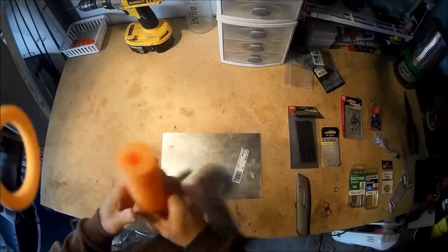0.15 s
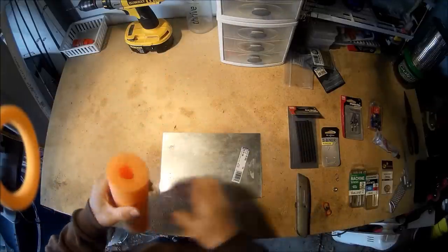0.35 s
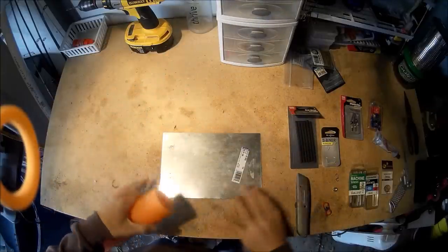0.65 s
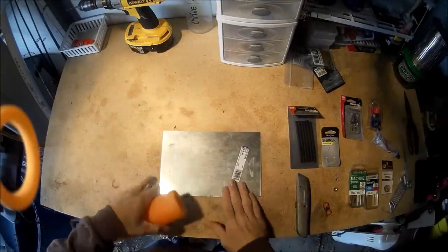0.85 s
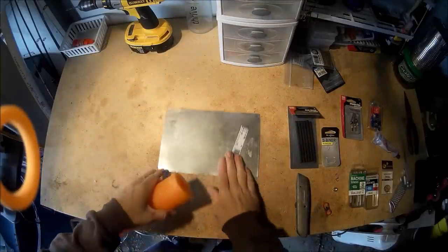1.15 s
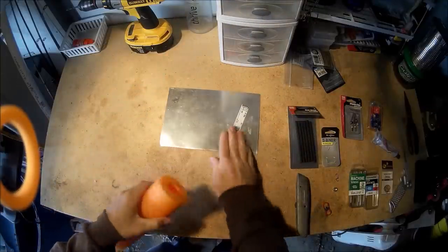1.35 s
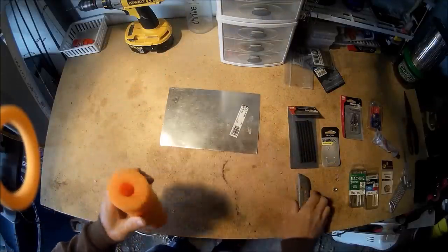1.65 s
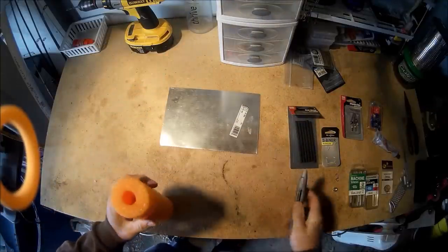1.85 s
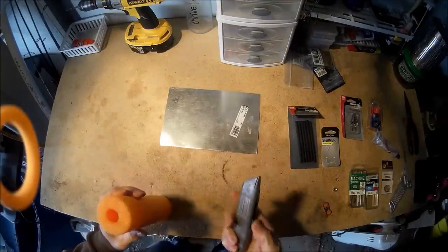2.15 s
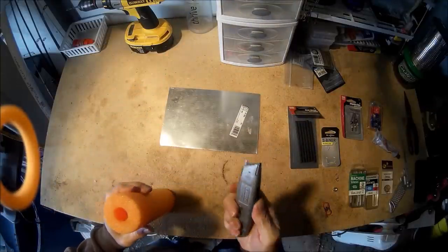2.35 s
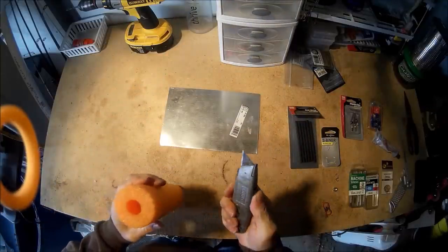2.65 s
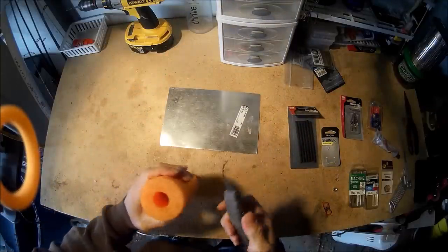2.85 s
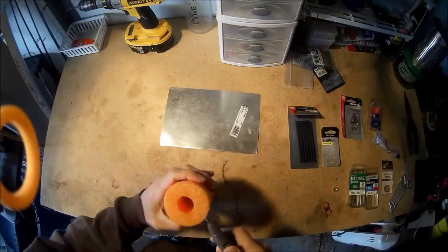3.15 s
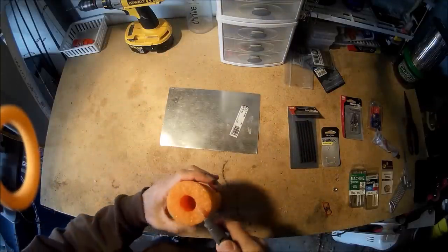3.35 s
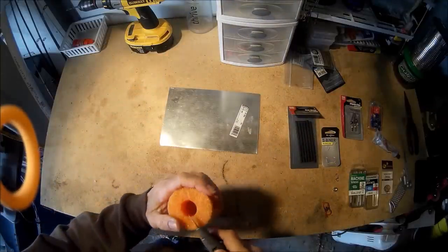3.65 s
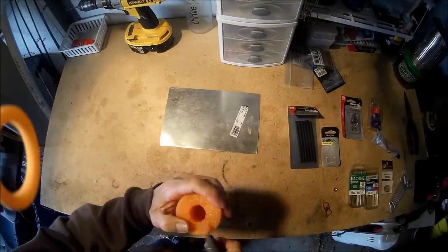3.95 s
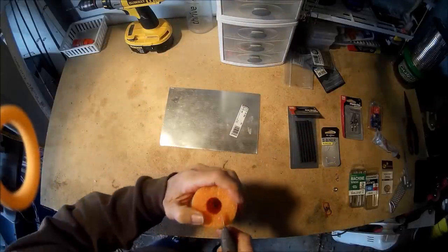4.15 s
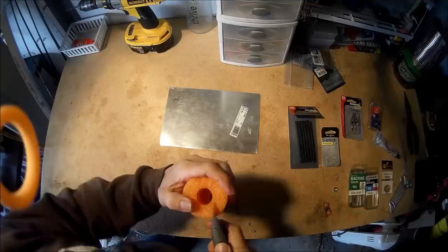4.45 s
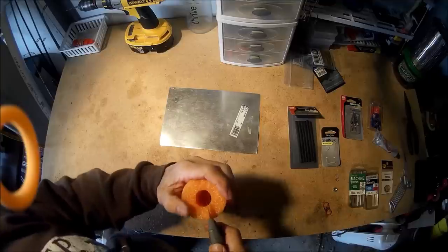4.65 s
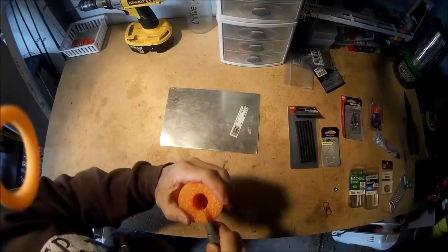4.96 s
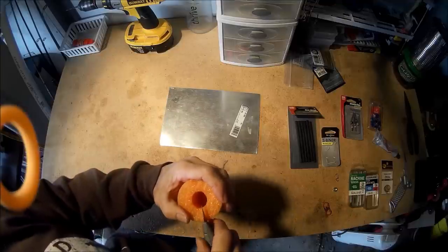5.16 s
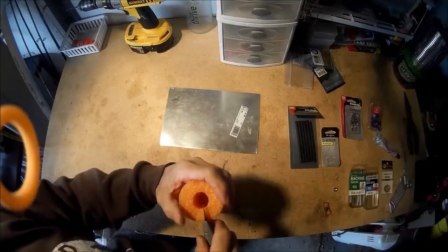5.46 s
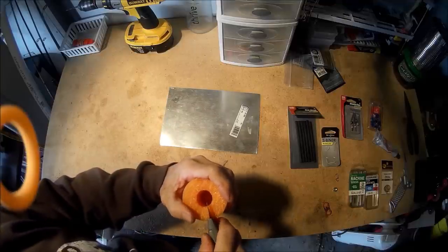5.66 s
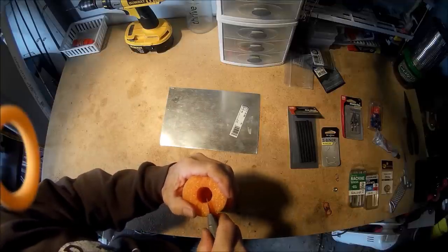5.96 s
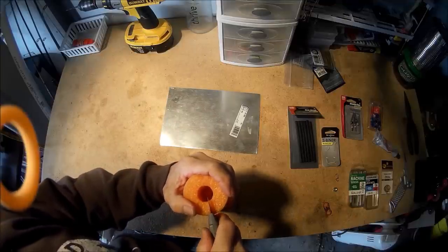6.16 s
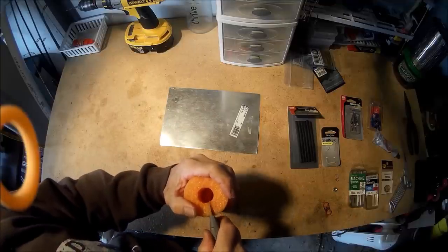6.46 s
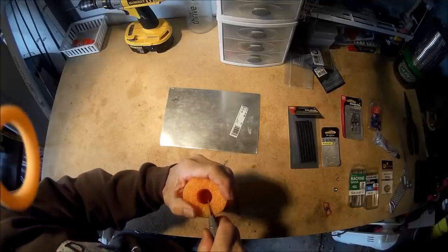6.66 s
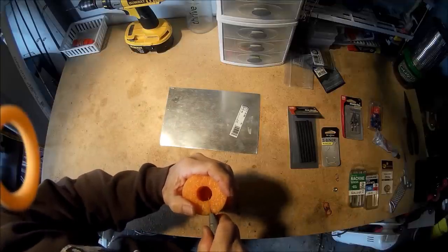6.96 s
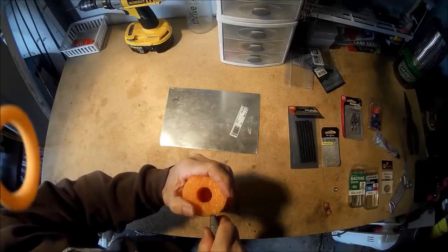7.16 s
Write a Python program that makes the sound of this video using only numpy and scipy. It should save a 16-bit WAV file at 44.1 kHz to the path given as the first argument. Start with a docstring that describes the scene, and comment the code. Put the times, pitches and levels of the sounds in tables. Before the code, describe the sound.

Quiet workbench handling with a sheet scrape and knife clicks, faint foam squeaks, one sharp loud pop, then short crisp tearing strokes.

```python
"""Foam rubs under turning fingers over a faint hiss; a steel sheet scrapes away and a utility knife rattles.
The blade rubs and ticks, breaks through a foam tube with one loud pop and slices on in crackly strokes.
Friction and tearing are random grains through coloured spectra; hard contacts ring sets of resonances.
Bench top and near shelves answer every handling sound in this small shop."""
import sys
import numpy as np
from scipy import signal
from scipy.fft import rfft, irfft, next_fast_len
from scipy.io import wavfile

SR = 44100
rng = np.random.default_rng(int(sys.argv[2]) if len(sys.argv) > 2 else 0)


def output_pcm(signal):
    """Save a mono or channel-first signal as 16-bit PCM at the path in sys.argv[1].

    Samples are clipped to [-1, 1] before scaling.
    """
    pcm = np.clip(np.atleast_2d(signal).T, -1, 1) * 32767
    wavfile.write(sys.argv[1], SR, np.round(pcm).astype(np.int16))


N = 322371
T = np.arange(N) / SR
SIZE = next_fast_len(N + SR)  # padded, so that tails do not wrap round
HZ = np.fft.rfftfreq(SIZE, 1 / SR)


def amp(db):
    """Decibels to gain."""
    return 10 ** (np.asarray(db) / 20)


def unit(x):
    """x at rms 1."""
    return x / np.sqrt(np.mean(x ** 2) + 1e-20)


def along(points, hz):
    """(Hz, value) points read on a log frequency axis."""
    f, value = np.transpose(points)
    return np.interp(np.log(hz + 1), np.log(f), value)


def gain(rows):
    """A (s, dB) curve as gain per sample, silent outside its span."""
    s, db = np.transpose(rows)
    return amp(np.interp(T, s, db, left=-200, right=-200))


def filtered(x, response):
    """x through a frequency response."""
    return irfft(rfft(x, SIZE) * response, SIZE)[:N]


def colour(points):
    """The causal response with this spectrum: its cepstrum is folded onto positive time."""
    cepstrum = irfft(np.log(amp(along(points, HZ))), SIZE)
    cepstrum[1:SIZE // 2] *= 2
    cepstrum[SIZE // 2:] = 0
    return np.exp(rfft(cepstrum))


def body(modes):
    """The summed response of resonances (Hz, width Hz, dB)."""
    return sum(amp(db) * 1j * HZ * w / (f * f - HZ * HZ + 1j * HZ * w) for f, w, db in modes)


def peaked(response):
    """The response scaled so that a unit impulse peaks at 1."""
    return response / np.abs(irfft(response, SIZE)).max()


def low_passed_noise(corner_hz):
    """Noise at rms 1 that wanders no faster than about corner_hz."""
    return unit(filtered(rng.standard_normal(N), 1 / (1 + (HZ / corner_hz) ** 4)))


def blows(rows, chatter=0, life=.003):
    """One impulse per (s, dB) row, with a chatter of the contact that decays over life seconds."""
    force = np.zeros(N + SR)
    t = T[:SR // 20]
    for s, db in rows:
        contact = chatter * rng.standard_normal(len(t)) * np.exp(-t / life)
        contact[0] = 1
        force[round(s * SR):][:len(t)] += amp(db) * contact / np.linalg.norm(contact)
    return force[:N]


def grains(rate, spread_db):
    """Random tiny impulses, rate per second, of uneven size and either sign, rms 1."""
    present = rng.random(N) < rate / SR
    sign = rng.choice([-1, 1], N)
    size = amp(spread_db * np.clip(rng.standard_normal(N), -2, 2))
    return unit(present * sign * size)


def swell(peak, rise, fall, db):
    """One push of the hand: a rounded rise and a steady fade, each spanning 20 dB in its time."""
    before = ((peak - T) / rise) ** 2
    after = (T - peak) / fall
    return amp(db - 20 * np.where(T < peak, before, after).clip(0, 10))


# Air rumble and hiss. Each row: frequency in Hz, relative level in dB.
HISS_SPECTRUM = [(12, -44), (20, -4), (27, -6), (74, -4), (116, -6.5), (215, -9.5), (247, -10), (431, -14),
                 (1110, -21), (1210, -21), (2180, -24.5), (14100, -27.5), (15800, -29.5)]


def air():
    """Steady low rumble and faint hiss of the air: coloured noise."""
    return amp(-68.5) * unit(filtered(rng.standard_normal(N), colour(HISS_SPECTRUM)))


# Reverb time of the shop. Each row: frequency in Hz, time to fall 60 dB in seconds.
ROOM_DECAY = [(200, 0.6), (2000, 0.27), (6000, 0.24), (14000, .18)]


def echoes(shelves_db, room_db):
    """The response of one spot in the shop: a quick scatter off the shelves and a short tail."""
    t = T[:SR // 2]
    shelves = rng.standard_normal(len(t)) * amp(-60 * t / 0.026) * (t > .002)
    # the tail fades at its own speed in each band
    hz, when, bands = signal.stft(rng.standard_normal(len(t)), SR, nperseg=256)
    fade = amp(-60 * when / along(ROOM_DECAY, hz)[:, None])
    tail = signal.istft(bands * fade, SR, nperseg=256)[1][:len(t)] * (t > .008)
    shelves = amp(shelves_db) * shelves / np.linalg.norm(shelves)
    tail = amp(room_db) * tail / np.linalg.norm(tail)
    absorbed = amp(along([(300, -6), (2000, 0.0), (4500, -2.5), (8000, -0.5), (9000, -6.5), (10500, -12.0)], HZ))
    return absorbed * rfft(shelves + tail, SIZE)


def shop(x, bench_db):
    """One dulled echo off the bench top; the other echoes drift steadily between two spots, for moving hands."""
    delay = np.exp(-2j * np.pi * HZ * .00148)  # 1.48 ms
    bounce = amp(bench_db) * delay / (1 + 1j * HZ / 5000)
    drift = 2 * np.pi * 1.3 * T
    shares = (np.cos(drift), np.sin(drift))
    spots = sum(filtered(x * share, echoes(shelves_db=-4.5, room_db=-14.5)) for share in shares)
    return filtered(x, 1 + bounce) + spots


# The sheet's slide before it catches and after it jerks free. Each row: time in seconds, relative scrape in dB.
SHEET_SLIDE = [
    [(0.9, -80), (0.976, -49.5), (1.074, -58), (1.172, -50), (1.202, -44), (1.26, -49), (1.273, -43)],
    [(1.278, -40), (1.322, -50.5), (1.33, -47.5), (1.44, -78)],
]
# Steel on grit. Each row: frequency in Hz, relative level in dB.
SCRAPE_SPECTRUM = [(290, -35), (500, -4), (620, -15), (686, -10), (997, -10), (1770, -1), (2130, -3.5),
                   (3430, -7), (4640, -7.5), (5920, -9), (7240, -8.5), (9370, -22), (14200, -28),
                   (15500, -36)]
# Damped modes of the sheet. Each row: frequency in Hz, width in Hz, relative level in dB.
SHEET_MODES = [(1740, 280, 0), (3070, 490, -6), (5140, 500, -10)]
# The shaken bench top. Each row: frequency in Hz, relative level in dB.
RUMBLE_SPECTRUM = [(41, -25), (70, -19), (103, 3), (214, -4), (278, 2.5), (378, 0), (454, -4), (700, -10.5),
                   (910, -8), (1540, -120)]
JUDDER_TOP_HZ, JUDDER_DB = 69.5, .9  # stick and slip: fastest wobble, rms depth
RUMBLE_DB, RUMBLE_GROWTH = -54, 0.61  # bench rumble at the hardest scrape; its dB per dB of scrape


def sheet():
    """The steel sheet judders over grit, sings in its damped modes, catches once and shakes the bench top."""
    grit = unit(filtered(grains(rate=6000, spread_db=4.5), colour(SCRAPE_SPECTRUM)))
    singing = body(SHEET_MODES) * colour([(600, -24), (1500, -3), (6000, -3), (12000, -10)])
    ring = unit(filtered(grains(rate=1800, spread_db=1.0), singing))
    drive = sum(gain(shove) for shove in SHEET_SLIDE)
    judder = amp(JUDDER_DB * low_passed_noise(JUDDER_TOP_HZ))
    scrape = drive * judder * (grit + amp(-6) * ring)
    shake = (drive / drive.max()) ** RUMBLE_GROWTH
    rumble = shake * unit(filtered(rng.standard_normal(N), colour(RUMBLE_SPECTRUM)))
    return amp(-2.5) * scrape + amp(RUMBLE_DB) * rumble


# Soft hand knocks on the bench. Each row: time in seconds, relative level in dB.
HAND_KNOCKS = [(0.721, -51.5), (0.748, -50), (1.562, -49.5), (1.604, -40), (1.638, -44.5), (1.685, -52.5),
               (1.713, -55)]
# Modes of the bench top. Each row: frequency in Hz, width in Hz, relative level in dB.
BENCH_MODES = [(113, 49, -7.5), (176, 53, -8), (291, 32, 2), (329.5, 26, 7), (397, 60, -12), (535, 41, -11),
               (734, 100, -18)]


def knocks():
    """The hand settles on the bench, too soft to excite the treble of its modes."""
    flesh = 1 / (1 + 1j * HZ / 800) ** 2
    contacts = blows(HAND_KNOCKS, chatter=0.11, life=0.026)
    return amp(4.5) * filtered(contacts, peaked(body(BENCH_MODES) * flesh))


# The handle gripped and the blade pushed out. Each row: time in seconds, relative level in dB, treble in dB.
HANDLE_RATTLES = [(1.6486, -17, -4.5), (1.67, -30, -9), (1.686, -36, -21), (1.7175, -46, -26),
                  (1.7562, -28.5, -40), (1.8468, -35.5, -13), (1.8528, -33.5, -19), (1.859, -32, -19),
                  (1.872, -44, -37), (1.9790, -28.5, -2), (1.9867, -37.5, -25), (1.9929, -32.5, -15),
                  (2.0896, -49, -20), (2.2688, -49, -6), (2.433, -49, -30)]
# Modes of the metal handle. Each row: frequency in Hz, width in Hz, relative level in dB.
HANDLE_MODES = [(2303, 92, -1), (3720, 300, 4), (4610, 290, 0.5), (5320, 190, -0.5), (5860, 120, 0.5),
                (6540, 300, 5), (7730, 200, 2.5), (8300, 160, 0), (9400, 150, -10), (10800, 150, -18)]
LOW_MODE_FALL = 0.85  # dB lost by the handle's lowest mode per dB of treble in a contact


def rattles(shift, scatter_db, treble_gain_db):
    """Each contact in the hand-damped handle is a dry crack plus its modes, slightly varied each time."""
    out = np.zeros(N + SR)
    t = T[:SR // 20]
    hz, width, level = np.transpose(HANDLE_MODES)[:, :, None]
    for s, db, treble_db in HANDLE_RATTLES:
        level_luck, pitch_luck, phase_luck = rng.standard_normal((3, len(hz), 1))
        treble = treble_db + treble_gain_db
        # harder contacts reach the upper modes, softer ones favour the lowest
        hardness = np.clip((hz - 5500) / 2500, 0, 1) * min(treble, 2)
        softness = np.minimum(-LOW_MODE_FALL * (hz < 3000) * treble, 4)
        strength = amp(level + hardness + softness + scatter_db * level_luck)
        phase = 2 * np.pi * hz * (1 + shift * pitch_luck) * t + np.pi * phase_luck
        ring = unit((strength * np.sin(phase) * np.exp(-np.pi * width * t)).sum(0))
        crack = unit(np.gradient(rng.standard_normal(len(t))) * np.exp(-t / 0.0048))
        click = ring + amp(treble_db / 2 + 0.5) * crack
        out[round(s * SR):][:len(t)] += amp(db + 10.5) * click / np.linalg.norm(click)
    return filtered(out[:N], 1 / (1 + (2500 / (HZ + 1)) ** 6))  # thin below 2.5 kHz


# The knife dragged off the bench. The row: peak in seconds, rise in seconds, fall in seconds, relative level in dB.
KNIFE_DRAG = (1.79, 0.2, 0.06, -56)
# The blade shifting in its holder. Each row: time in seconds, relative level in dB.
BLADE_TICKS = [(3.5186, -48), (4.043, -50.5), (4.266, -19), (4.4182, -42.5), (4.649, -41), (4.8206, -49)]
# Modes of the blade. Each row: frequency in Hz, width in Hz, relative level in dB.
BLADE_MODES = [(3650, 370, -2.5), (4600, 310, -10), (5030, 180, 12.5), (5330, 390, 6), (5800, 360, 3),
               (7000, 760, -3), (7480, 180, -1), (8440, 140, 0), (9000, 350, -1.5), (12500, 1300, -8)]


def knife():
    """The knife drags off the bench and rattles in the grip; later the blade ticks under load."""
    scraping = body(HANDLE_MODES) + amp(-5) * colour(SQUEAK_SPECTRUM)
    drag = amp(1.5) * swell(*KNIFE_DRAG) * unit(filtered(grains(rate=900, spread_db=3.0), scraping))
    contacts = blows(BLADE_TICKS, chatter=0.28, life=0.0022)
    ticks = amp(1.0) * filtered(contacts, peaked(body(BLADE_MODES)))
    metal = rattles(shift=0.022, scatter_db=2.0, treble_gain_db=8) + drag + ticks
    return filtered(metal, colour([(9500, 0.5), (10500, -8.0), (15000, -12.5)]))


# Foam squeaking on skin or steel. Each row: frequency in Hz, relative level in dB.
SQUEAK_SPECTRUM = [(240, -49.5), (400, -4), (705, -13), (1030, -12.5), (1510, -5), (2030, -4), (2470, 1.5),
                   (3060, -1), (6580, -0.5), (9650, -12.5), (14100, -35), (15500, -50.5)]
GRIP_DB, SPLIT_GRIP_DB = -87, -81.5  # creaking of the held tube, whole and split


def creaks():
    """Single cells give way under the fingers, more strongly once the tube is split."""
    grip = amp(np.where(T < POP_CRACKS[0][0], GRIP_DB, SPLIT_GRIP_DB))
    return grip * unit(filtered(grains(rate=110, spread_db=7.0), colour(SQUEAK_SPECTRUM)))


# Faint squeaks of gripped foam. Each row: start in seconds, length in seconds, start pitch in Hz,
# end pitch in Hz, width in Hz, relative level in dB.
FOAM_SQUEALS = [(2.327, 0.077, 2030, 1930, 200, -76), (2.745, 0.24, 3620, 3540, 100, -69),
                (3.513, 0.18, 3700, 3640, 160, -76), (3.746, 0.78, 1747, 1715, 220, -77),
                (4.28, .6, 1670, 1630, 220, -74.5)]
SQUEAL_PEAK = .2  # share of its length at which a squeak's swell is highest


def squeals():
    """Where the slipping turns nearly regular, a narrow, fuzzy tone swells and sags."""
    out = np.zeros(N)
    for s, length, start_hz, end_hz, width_hz, db in FOAM_SQUEALS:
        u = np.linspace(0, 1, round(length * SR))
        fuzz = low_passed_noise(width_hz / 2)[:len(u)]
        pitch = start_hz + (end_hz - start_hz) * u
        tone = np.sqrt(2) * fuzz * np.sin(2 * np.pi * np.cumsum(pitch) / SR)
        shape = u / SQUEAL_PEAK * np.exp(1 - u / SQUEAL_PEAK)
        out[round(s * SR):][:len(u)] += amp(db - 1.5) * tone * shape
    return out


# Fingers and blade rubbing on foam. Each row: peak in seconds, rise in seconds, fall in seconds,
# relative level in dB.
FOAM_RUBS = [(.095, 0.023, 0.059, -64), (.2, .01, .06, -55.5), (.232, 0.033, 0.081, -48),
             (.36, 0.027, 0.079, -69.5), (.62, 0.023, 0.16, -67.5), (.72, 0.011, .3, -69),
             (2.01, .02, .3, -69.5), (2.16, 0.019, 0.038, -63.5), (2.268, 0.009, 0.028, -61),
             (2.42, 0.11, 0.049, -67.5), (3.0, 0.027, .025, -64), (3.31, 0.017, 0.046, -63.5),
             (3.455, .06, 0.067, -59.5), (3.552, 0.021, 0.029, -61.5), (3.61, .03, 0.23, -67.5),
             (3.881, 0.082, 0.11, -62), (3.98, 0.023, .03, -66), (4.152, 0.023, 0.038, -53.5)]
# The blade gliding through the slit it has opened. Each row: peak in seconds, rise in seconds,
# fall in seconds, relative level in dB.
BLADE_GLIDES = [(4.25, 0.06, 0.21, -53), (6.44, .045, 0.085, -42)]


def rubbing():
    """Skin and steel stick and slip on the fine cells of the foam; a gliding blade also stirs the tube."""
    pressure = sum(swell(*push) for push in FOAM_RUBS)
    rub = pressure * unit(filtered(grains(rate=3900, spread_db=3.5), colour(SQUEAK_SPECTRUM)))
    swish = colour([(100, -6.0), (420, -3.5), (700, -7), (1000, -3), (2200, -2.5),
                    (4000, -6.0), (7500, -8.5), (10000, -18.5), (15000, -31.5)])
    stirred = swish * (1 + amp(-4) * body(TUBE_MODES))
    slips = unit(filtered(grains(rate=2200, spread_db=5.5), stirred))
    glide = sum(swell(*push) for push in BLADE_GLIDES) * slips
    return amp(-2.5) * rub + amp(-5.0) * glide


# The blade breaking through the tube's skin: first crack, then its duller follow-ups.
# Each row: time in seconds, dry peak in dB, brightness (low-pass corner) in Hz.
POP_CRACKS = [(6.3847, 0, 30400), (6.3862, -6, 3580), (6.387, -12.5, 12000), (6.398, -19, 5100),
              (6.3994, -19.5, 4030)]
# The bursting skin. Each row: frequency in Hz, relative level in dB.
BURST_SPECTRUM = [(60, -38.5), (300, -20), (700, -16), (950, -10.5), (1300, -5), (1800, 3), (2400, 2.5),
                  (3200, 2.5), (4200, 3), (5900, -4), (7600, 2.5), (9000, -3.5), (10800, -14.5),
                  (13500, -8.5), (16000, -9.5)]
# Modes of the foam tube's wall. Each row: frequency in Hz, width in Hz, relative level in dB.
TUBE_MODES = [(1330, 25, -5), (1855, 28, -1), (2016, 27, 1.5), (2444, 28, -1), (2620, 39, -5.5),
              (2630, 34, -4.5), (3164, 21, -4), (3940, 50, 0), (4200, 35, -2.5), (4930, 30, -2),
              (7360, 57, -8)]
# The air in the tube's bore. Each row: frequency in Hz, width in Hz, relative level in dB.
BORE_MODES = [(293, 14, 0)]


def pop():
    """The skin splits in quick cracks; the tube wall rings briefly and the air in its bore hums once."""
    burst = colour(BURST_SPECTRUM)
    cracks = 0
    for s, db, bright_hz in POP_CRACKS:
        dulled = burst / (1 + 1j * HZ / bright_hz) ** 2
        cracks = cracks + filtered(blows([(s, db)]), peaked(dulled))
    ring = amp(-22.5) * peaked(body(TUBE_MODES)) + amp(-43.0) * peaked(body(BORE_MODES))
    return cracks + filtered(blows([POP_CRACKS[0][:2]]), ring)


BITE_S, RELEASE_S = 0.0034, 0.0036  # attack and release of a stroke
RELAX_DB, RELAX_S = -26.5, 0.05  # rustle after a stroke: level against it, decay


def stroke(start, length, db):
    """The blade bites, tears evenly and lets go; the foam rustles on as it relaxes."""
    bite = np.clip((T - start) / BITE_S + 1 / 2, 0, 1)
    after = np.maximum(T - start - length, 0)
    return amp(db) * bite * (np.exp(-after / RELEASE_S) + amp(RELAX_DB) * np.exp(-after / RELAX_S))


# Nicks and strokes of the blade. Each row: start in seconds, length in seconds, relative level in dB.
BLADE_CUTS = [(3.133, 0.013, -61.5), (3.216, .018, -58.5), (4.227, 0.021, -54.5), (5.389, 0.0039, -51.5),
              (6.362, 0.0022, -50), (6.377, .003, -46), (6.392, .017, -37), (6.632, 0.041, -53),
              (6.816, 0.043, -45.5), (7.076, 0.029, -44.5), (7.252, 0.031, -50.5)]
# Thick cell walls giving way under the blade. Each row: time in seconds, relative peak in dB.
WALL_SNAPS = [(6.6219, -35.5), (6.636, -29.5), (6.651, -30), (6.666, -25), (6.8220, -20.5), (6.8300, -22.5),
              (7.0799, -25), (7.0881, -15), (7.0957, -16), (7.1167, -29.5), (7.125, -27), (7.2600, -31),
              (7.2667, -22), (7.2816, -16.5)]
# Tearing foam. Each row: frequency in Hz, relative level in dB.
TEAR_SPECTRUM = [(60, -27), (250, -8.5), (700, -15), (1300, -5), (2600, -1.5), (3400, -2), (4100, -1.5),
                 (5600, -2), (7400, 1.5), (8600, -5.5), (10000, -12.5), (14000, -18.5), (16000, -32)]
CHAIN_DB, CHAIN_S = -14.5, 0.0026  # neighbouring cells bursting: level against the snap's row, decay


def cutting():
    """Closed cells burst in dense runs; each thick wall that snaps takes a few neighbours with it."""
    effort = sum(stroke(*cut) for cut in BLADE_CUTS)
    chain = sum(amp(db + CHAIN_DB) * (T > s) * np.exp(-np.abs(T - s) / CHAIN_S) for s, db in WALL_SNAPS)
    foam = colour(TEAR_SPECTRUM) * (1 + amp(-7) * body(TUBE_MODES))
    crisp = foam * colour([(6000, 0), (12000, 2.5)])
    crackle = effort * unit(filtered(grains(rate=1500, spread_db=5), foam))
    bursts = chain * unit(filtered(grains(rate=3500, spread_db=2.5), crisp))
    late_snaps = [(s + 0.00071, db) for s, db in WALL_SNAPS]  # 0.71 ms after the chain sets in
    snaps = filtered(blows(late_snaps), peaked(crisp))
    return amp(-2) * crackle + bursts + amp(-3.5) * snaps


def scene():
    """All the handling in the shop, over steady air rumble and hiss."""
    bench_work = sheet() + knocks() + knife()
    foam_work = creaks() + squeals() + rubbing() + pop() + cutting()
    return (shop(bench_work + foam_work, bench_db=-16.0) + air())[None]


CEILING = .54  # level the rounded peaks cannot pass, before the band limit
TOP_HZ = 15850  # band limit


def record(dry):
    """Rounds off the highest peaks, then cuts steeply above the band limit."""
    rounded = dry[0] / (1 + (dry[0] / CEILING) ** 4) ** (1 / 4)
    return filtered(rounded, 1 / (1 + (HZ / TOP_HZ) ** 120))[None]


dry = scene()
out = record(dry)
output_pcm(out)
```